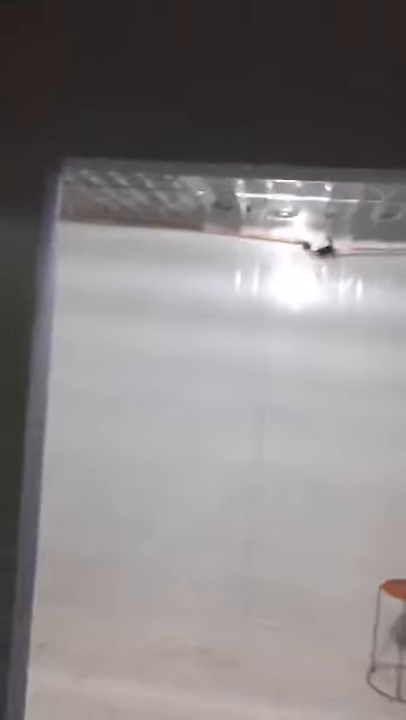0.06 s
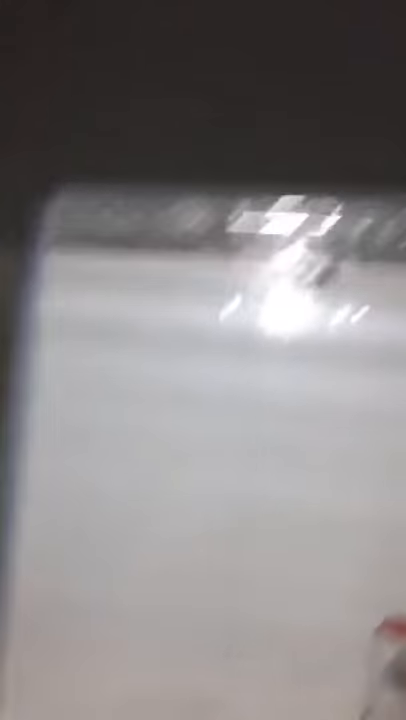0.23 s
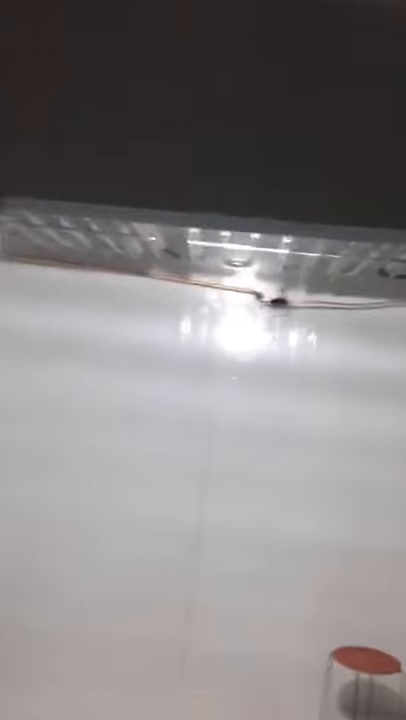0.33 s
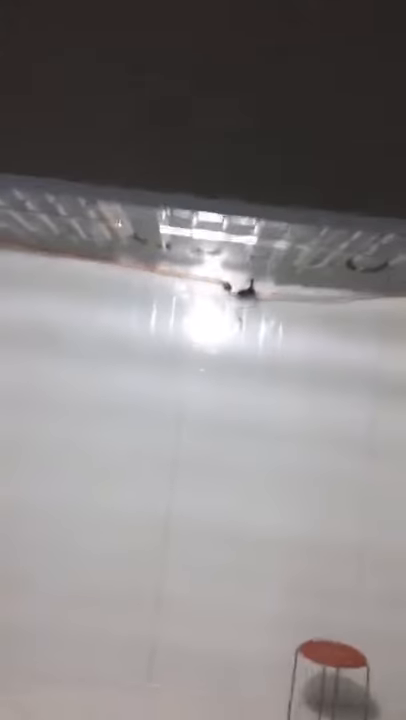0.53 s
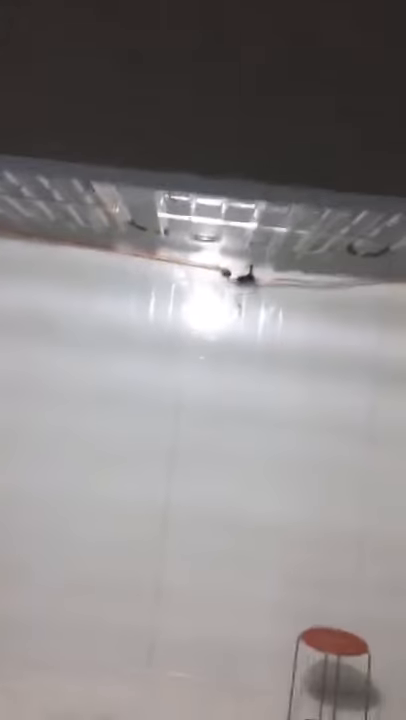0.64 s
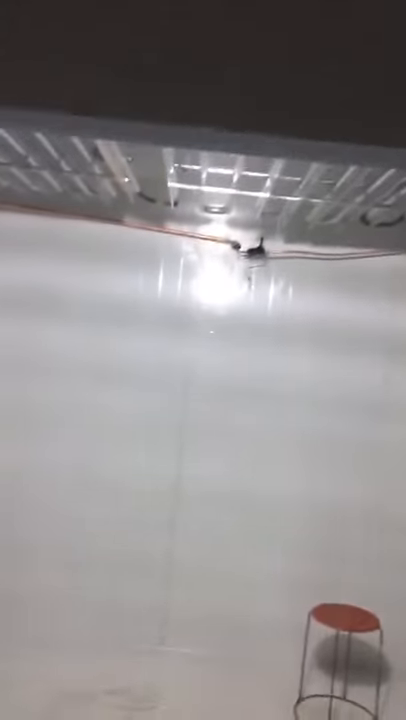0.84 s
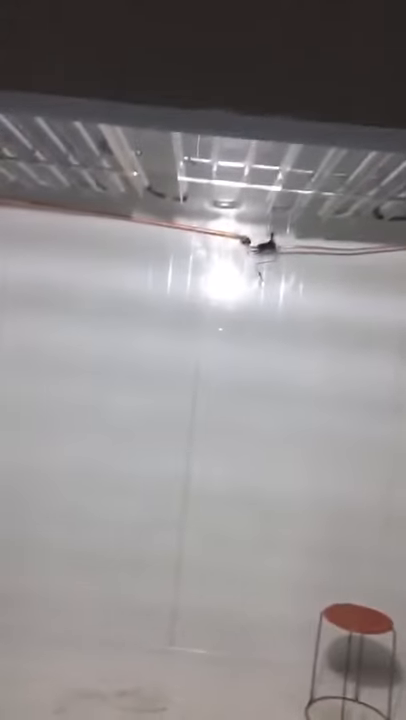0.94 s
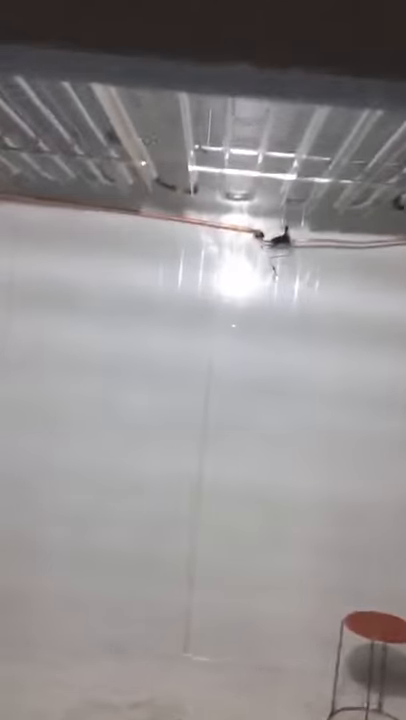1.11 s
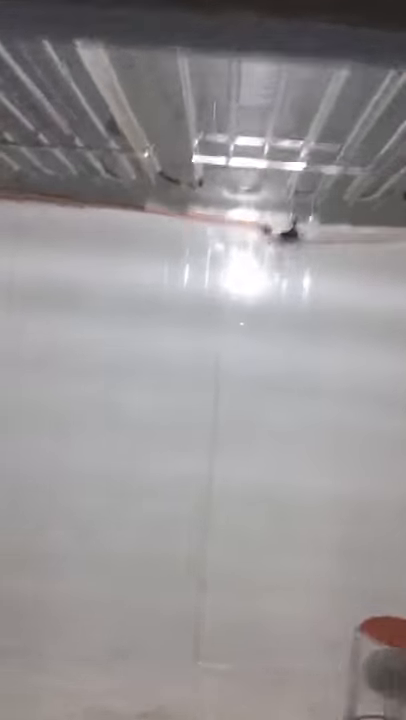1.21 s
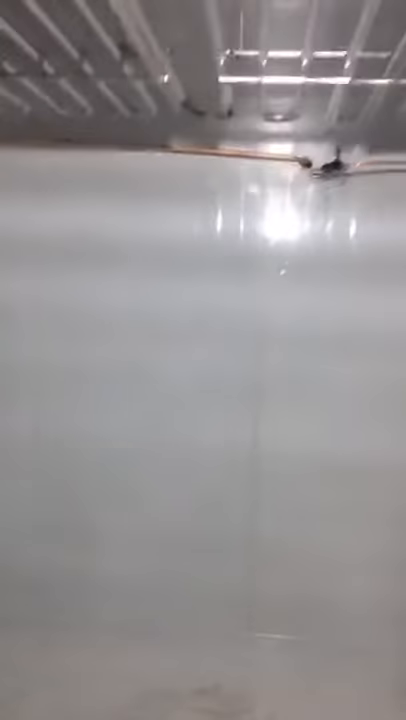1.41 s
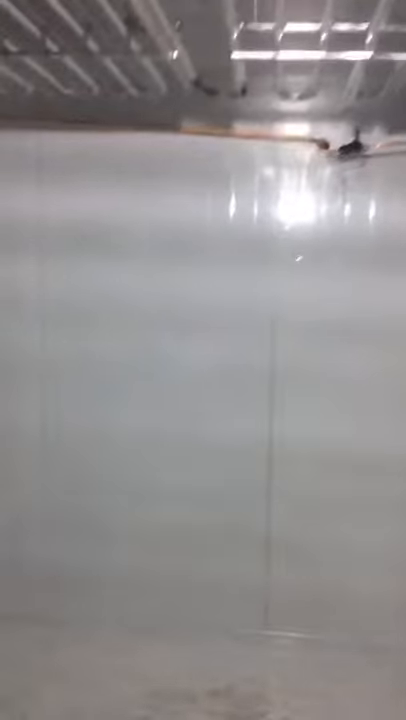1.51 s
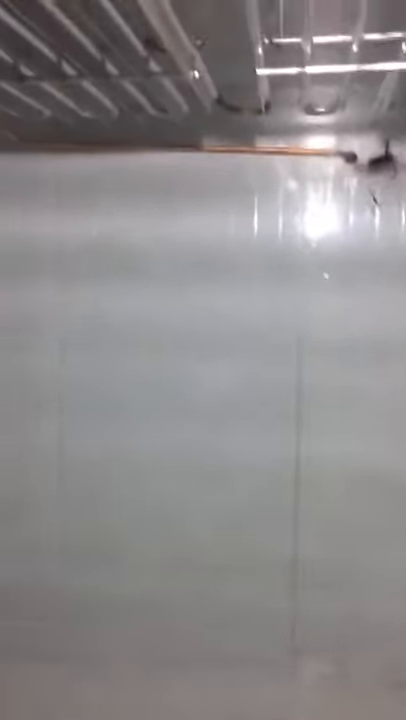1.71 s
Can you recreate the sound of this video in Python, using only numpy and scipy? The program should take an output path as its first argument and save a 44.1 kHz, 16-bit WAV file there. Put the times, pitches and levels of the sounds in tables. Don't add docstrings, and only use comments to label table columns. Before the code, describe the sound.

Loud rattling clack of a steel door latch near the start, with a bright tick and metallic ring, then quiet footfalls and a softer booming double bump, in an empty reverberant room with distant plant drone, phone-captured.

```python
import sys
import numpy as np
from scipy import signal
from scipy.fft import rfft, irfft, next_fast_len
from scipy.io import wavfile
from scipy.ndimage import map_coordinates

SR = 44100
rng = np.random.default_rng(int(sys.argv[2]) if len(sys.argv) > 2 else 0)


def wav_record(signal):
    frames = np.transpose(np.atleast_2d(signal))
    bounded = np.clip(frames, -1, 1)
    quanta = np.round(bounded * 32767).astype(np.int16)
    wavfile.write(sys.argv[1], SR, quanta)


def volts(x):
    e = np.asarray(x, float) / 20
    return 10 ** e


N = 77175

# [t/s, level/dB, bright part/dB, crunch t60/s]
LATCH = [
    (.2057, -9, -19.5, 0.0062),
    (.2098, -11.5, -16, 0.016),
    (.2135, -15, -16, 0.018),
    (.2178, -13, -10, 0.015),
    (.2195, -5.5, -20, 0.0052),
    (.2238, -10.5, -14.5, 0.035),
    (.2290, -14, -11, 0.06),
    (.2320, -17, -26, 0.028),
    (.2410, -15.5, -20, 0.011),
]
# [f/Hz, width/Hz, level/dB]
LATCH_BODY = [(283, 780, -19.5), (917, 150, -6), (1195, 137, -6), (1575, 85, 3), (1813, 120, -0.5),
              (2052, 320, -3), (2423, 175, 1.5), (2910, 600, -9.5)]
# [f/Hz, width/Hz, level/dB]
LATCH_BRIGHT = [(4100, 1400, 0.88), (6600, 1400, -0.25), (7700, 2300, -1.9), (11100, 1500, 0.6),
                (11600, 1400, -2.4)]
# [t/s, level/dB, bright part/dB, crunch t60/s]
SNAP = [
    (.2216, -27, 9.9, 0.0092),
]
# [f/Hz, width/Hz, level/dB]
SNAP_BRIGHT = [(5120, 3600, -4), (8660, 2800, -2.5), (11500, 4600, -4)]
# [f/Hz, width/Hz, level/dB]
PLATE = [(890, 500, -9.5), (1570, 150, 3.5), (2320, 910, -9.5), (4270, 1600, -11), (7400, 4600, -19.5)]
# [f/Hz, level/dB, t60/s]
SKIN = [(1500, -41.5, 1), (1627, -41, 0.87), (1650, -42.5, 1), (2500, -32, 0.55)]
# [t/s, level/dB, bright part/dB, crunch t60/s]
THUMPS = [
    (1.2710, -21, -27.5, 0.072),
    (1.2790, -24, -26, 0.06),
    (1.293, -22, -20, 0.09),
    (1.308, -28.5, -34, 0.036),
    (1.3205, -19.5, -29, 0.034),
    (1.3245, -17, -19.5, 0.16),
    (1.341, -23.5, -36, .06),
    (1.374, -26.5, -36, 0.039),
]
# [f/Hz, width/Hz, level/dB]
PANEL = [(183, 145, -5.5), (315, 244, -5.5), (457, 105, -5), (625, 112, -2.5), (810, 117, 0.5),
         (1150, 220, -7), (1347, 360, -8), (1960, 600, -14)]
# [f/Hz, width/Hz, level/dB]
PANEL_BRIGHT = [(2440, 144, 5), (3800, 520, -0.5), (5450, 860, -6), (7960, 2600, -12.5)]
# [t/s, level/dB, bright part/dB, crunch t60/s]
TAPS = [
    (.9615, -43, -5, 0.012),
    (.978, -34.5, -1, 0.036),
    (.9925, -28, -6, 0.083),
    (1.0375, -38, -31, 0.048),
    (1.1975, -36, -4, 0.049),
]
# [f/Hz, width/Hz, level/dB]
SOLE = [(192, 88, 5), (410, 115, 9), (950, 453, 2)]
# [f/Hz, width/Hz, level/dB]
SOLE_BRIGHT = [(2360, 130, 1), (3500, 260, 1.5), (4320, 720, -1.5), (6960, 2500, -14), (10630, 2400, -15)]
# [t/s, level/dB, bright part/dB, crunch t60/s]
KNOCK = [
    (.6803, -32, -40, 0.017),
    (1.2955, -63.5, 11.5, 0.016),
]
# [f/Hz, width/Hz, level/dB]
KNOCK_BODY = [(930, 300, 0.19), (1340, 750, -2.3)]
# [f/Hz, width/Hz, level/dB]
TICK = [(7560, 2100, 2.5)]
# [t/s, level/dB, bright part/dB, crunch
# t60/s]
BUMPS = [
    (.065, -39, -40, 0.017),
    (.138, -40, -36, 0.12),
    (.181, -37, -41.5, 0.034),
    (.355, -39, -41, 0.055),
    (1.1985, -41.5, -26.5, 0.029),
    (1.685, -41.5, -44, 0.017),
]
# [f/Hz, width/Hz, level/dB]
LEAF = [(198, 37, 0.0098), (292, 73, 0.0026)]
# [t/s, rise/s, hold/s, fall/s, level/dB]
SCUFFS = [
    (.01, 0.022, .05, 0.054, -56.5),
    (0.699, .06, 0.014, .025, -57),
    (0.842, 0.066, .03, 0.45, -63.5),
    (1.331, 0.043, .16, 0.13, -53),
]
# [f/Hz, level/dB]
SCUFF = [(500, -66), (1500, 9.5), (4000, -2.5), (7000, 0), (12000, -4.5), (16000, -21)]
# [f/Hz, level/dB per Hz]
RUMBLE = [(24, -78), (40, -36.5), (131, 1), (326, -11), (449, -9), (1400, -17.5), (3070, -27.5),
          (11400, -32), (14600, -49)]
# [f/Hz, width/Hz, level/dB]
HUM = [(140.8, 18, 0), (191.2, 26.4, 0), (240.7, 49, -4.5)]
# [t/s, level/dB]
PLANT = [(0.0, -40), (0.58, -47), (1.1, -48.5), (1.306, -42.5), (1.642, -56), (1.75, -56)]
# [f/Hz, t60/s]
ROOM = [(150, 0.35), (500, 0.73), (1000, 0.62), (2000, 0.93), (4000, 0.91), (8000, 0.63), (13000, .35)]

SOFT_HZ = 2250


def unit(x):
    return x / np.sqrt(np.mean(x ** 2) + 1e-20)


def along(points, hz):
    f, v = np.transpose(points)
    return np.interp(np.log(hz + 1), np.log(f + 1), v)


def wobble(rate):
    knots = rng.standard_normal(int(N * rate / SR) + 4)
    return map_coordinates(knots, [np.arange(N) * rate / SR])


def filtered(x, response):
    m = next_fast_len(N + SR // 2)
    return irfft(rfft(x, m) * response(np.fft.rfftfreq(m, 1 / SR)), m)[..., :N]


def body(peaks):
    def response(f):
        total = 0
        for k, (centre, width, db) in enumerate(peaks):
            damping = 1j * f * width
            sign = (-1) ** k
            total = total + sign * volts(db) * damping / (centre ** 2 - f ** 2 + damping)
        return total
    return response


def noise(spectrum):
    return unit(filtered(rng.standard_normal(N), lambda hz: volts(along(spectrum, hz))))


def swell(start, rise, hold, fall):
    corners = np.cumsum([start, rise, hold, fall])
    ramp = np.interp(np.arange(N) / SR, corners, [0, 1, 1, 0])
    return np.sin(np.pi / 2 * ramp) ** 2


def knocks(rows, low, bright, soft_hz=9000):
    length, rise_s = 4096, 0.00028
    t = np.arange(length) / SR
    drive = np.zeros((2, N + length))
    for s, db, bright_db, t60 in rows:
        grit = rng.standard_normal((2, length))
        grit = rfft(grit * volts(-60 * t / t60) * (1 - np.exp(-t / rise_s)))
        grit = irfft(grit / np.abs(grit))
        grit = grit * volts(-20 * t / t60)
        grit = grit / np.linalg.norm(grit, axis=1)[:, None]
        start = round(s * SR)
        drive[:, start:start + length] += volts([[db], [db + bright_db]]) * grit
    click = np.arange(N) == 0
    size = np.abs(filtered(click, body(low))).max()
    deep = filtered(drive[0, :N], lambda hz: body(low)(hz) / (1 + 1j * hz / soft_hz) ** 2)
    return (deep + filtered(drive[1, :N], body(bright))) / size


def latch():
    return knocks(LATCH, LATCH_BODY, LATCH_BRIGHT) + knocks(SNAP, LATCH_BODY, SNAP_BRIGHT)


def scrape():
    start_s, rise_s, end_s, fall_s = 0.13, 0.031, 0.205, 0.0056
    friction = rng.standard_normal(N) * volts(2 * wobble(150))
    drag = unit(filtered(friction, body(PLATE)))
    return volts(-47.5) * drag * swell(start_s, rise_s, end_s - start_s - rise_s, fall_s)


def skin():
    blow_s = 0.24
    t = np.clip(np.arange(N) / SR - blow_s, 0, None)
    ring = np.zeros(N)
    for hz, db, t60 in SKIN:
        ring += volts(db - 60 * t / t60 + 3.7 * wobble(36.9)) * np.sin(2 * np.pi * hz * t)
    return ring


def thumps():
    return knocks(THUMPS, PANEL, PANEL_BRIGHT, SOFT_HZ)


def taps():
    return knocks(TAPS, SOLE, SOLE_BRIGHT)


def far_knock():
    return knocks(KNOCK, KNOCK_BODY, TICK, SOFT_HZ)


def bumps():
    return knocks(BUMPS, LEAF, TICK, SOFT_HZ)


def scuffs():
    strength = sum(volts(db) * swell(s, rise, hold, fall) for s, rise, hold, fall, db in SCUFFS)
    return noise(SCUFF) * volts(0.47 * wobble(90)) * strength


def plant():
    floor_db, hum_db, lumps_db = -50.5, -3.5, 2.3
    s, level_db = np.transpose(PLANT)
    doorway_db = np.interp(np.arange(N) / SR, s, level_db - level_db.mean())
    drone = filtered(rng.standard_normal(N), body(HUM))
    drone = unit(filtered(drone, body(HUM)))
    drone *= volts(hum_db + doorway_db + lumps_db * wobble(18))
    rumble = noise([(13, -32.5)] + list(RUMBLE) + [(17000, -80)])
    rumble *= volts(0.37 * wobble(7.4))
    return volts(floor_db) * (rumble + drone)


def room(x, wet_db):
    first_wall_s, build_s = 0.006, 0.0095
    hz, t, z = signal.stft(rng.standard_normal(SR), SR, nperseg=256)
    decay = volts(-60 * t / along(ROOM, hz)[:, None])
    tail = signal.istft(z * decay, SR, nperseg=256)[1]
    tail = tail * (1 - np.exp(-np.arange(len(tail)) / SR / build_s))
    tail = np.pad(tail / np.linalg.norm(tail), (round(first_wall_s * SR), 0))
    return x + volts(wet_db) * signal.fftconvolve(x, tail)[:N]


def scene():
    door = room(latch() + scrape(), wet_db=-8) + skin()
    panels = room(thumps(), wet_db=-4)
    steps = room(taps() + far_knock() + bumps() + scuffs(), wet_db=-6.5)
    return (door + panels + steps + plant())[None]


def band_limit(x):
    return signal.sosfilt(signal.butter(12, 14700, fs=SR, output="sos"), x)


def record(dry):
    low_hz, top_hz = 69, 14400
    mix = filtered(dry, lambda hz: (1j * hz / (low_hz + 1j * hz)) ** 2 * (hz < top_hz))
    return band_limit(mix)


dry = scene()
out = record(dry)
wav_record(out)
```